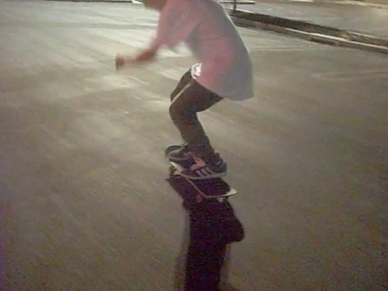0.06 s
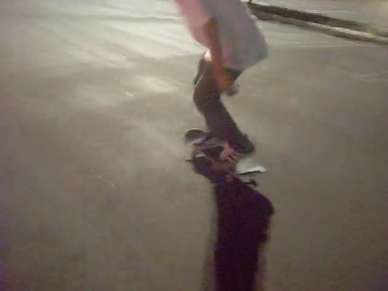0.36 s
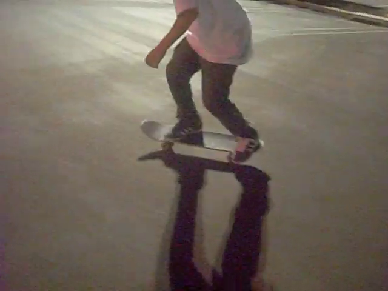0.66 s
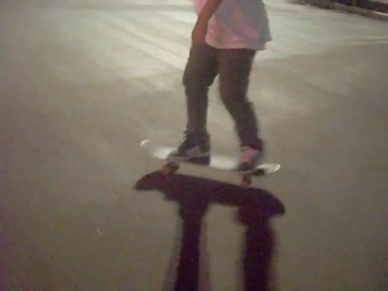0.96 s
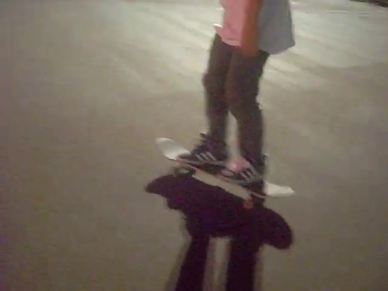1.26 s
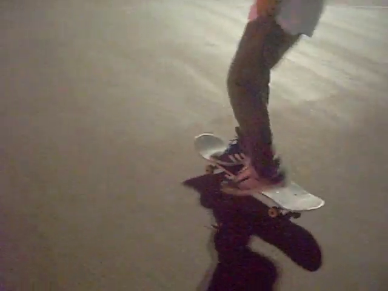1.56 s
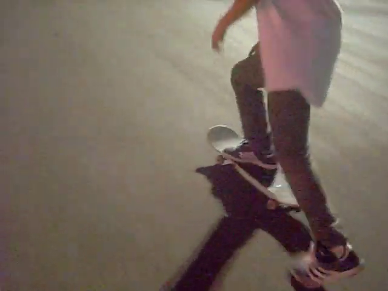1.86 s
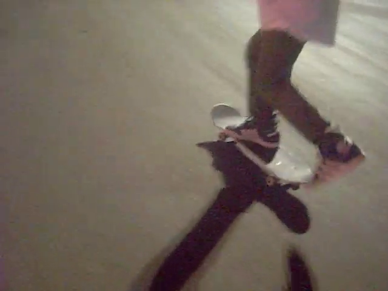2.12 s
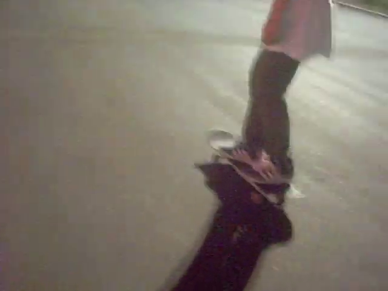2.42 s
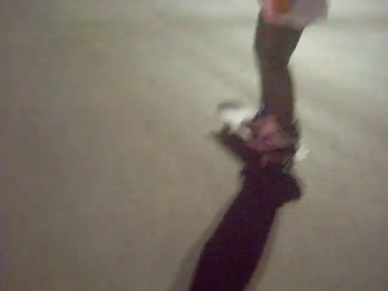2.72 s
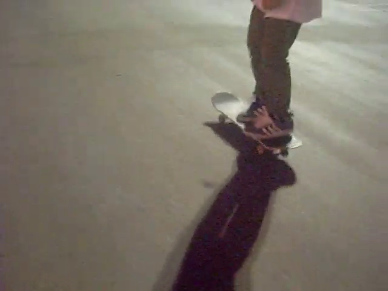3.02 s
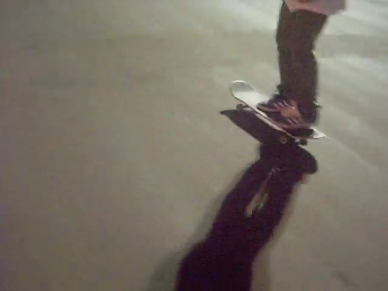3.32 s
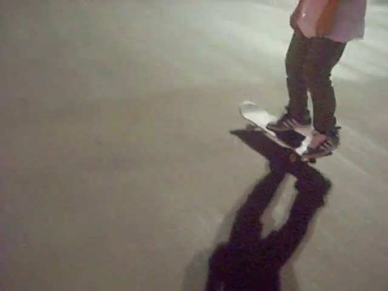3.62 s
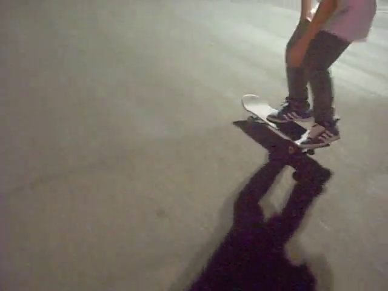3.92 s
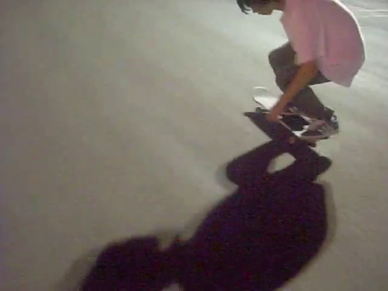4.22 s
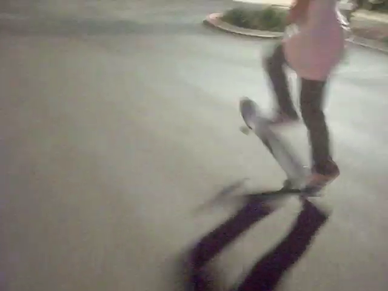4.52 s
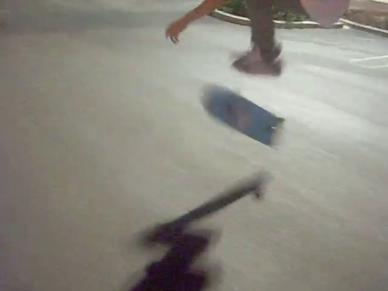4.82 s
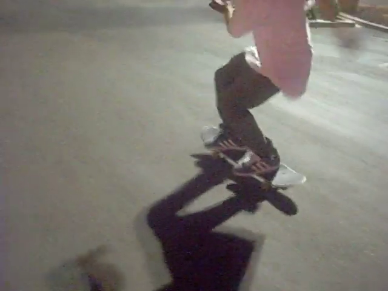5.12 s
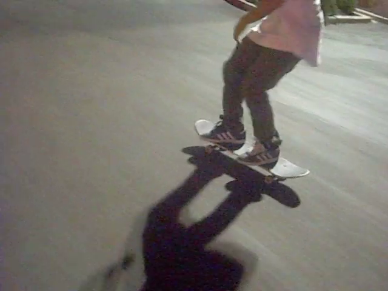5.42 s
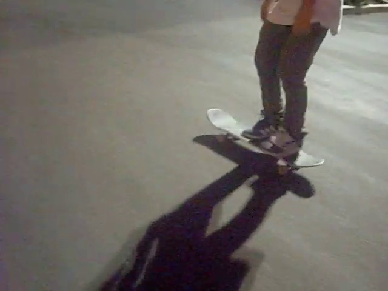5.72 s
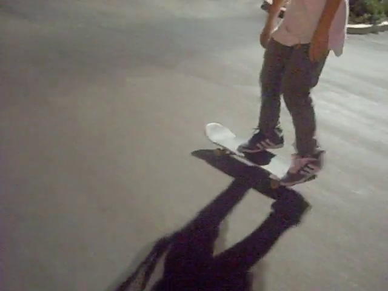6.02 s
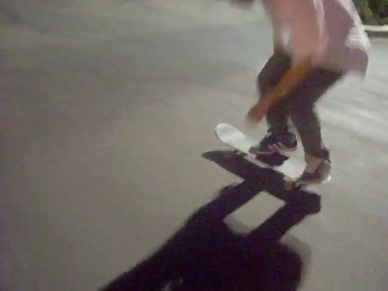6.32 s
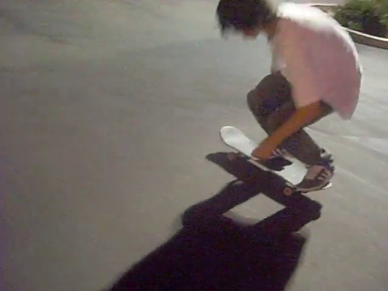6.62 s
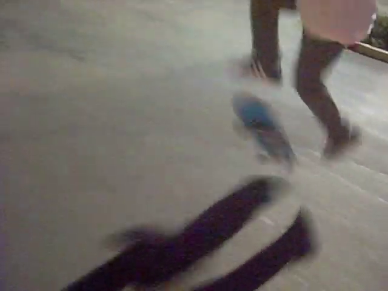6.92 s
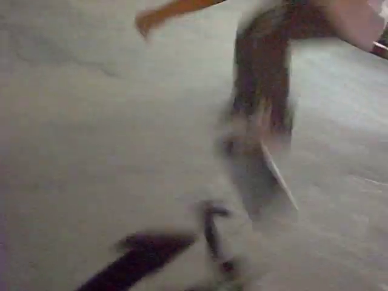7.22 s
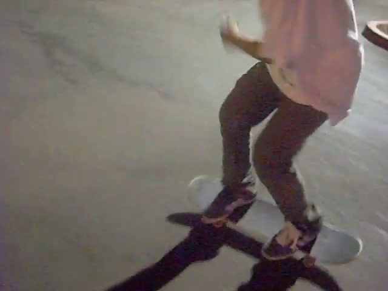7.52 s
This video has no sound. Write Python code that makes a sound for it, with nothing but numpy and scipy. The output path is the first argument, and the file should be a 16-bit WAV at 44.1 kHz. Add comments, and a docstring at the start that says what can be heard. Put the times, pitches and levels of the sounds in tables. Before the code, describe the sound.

A skateboard hits asphalt with a loud clack right at the start, followed by two lighter knocks around half a second. The wheels roll on with a gritty grind and low hum, swelling and easing, dotted with stone ticks, small deck knocks and faint, brief skids. Shoes scuff the grip tape from about 4.2 seconds, the tail pops lightly near 4.6, and after a short lull the board slams down at 5 with a loud, chattering crack. Wind buffets the close microphone, with soft low pops from about 5.8 to 6.8 seconds. Another scuff leads to a sharper pop at 7 and a second hard landing at 7.3, with a quick skid before the rolling continues to nearly 8 seconds. The landings overload slightly and leave a faint echo in the open parking lot. The sound has limited treble and a steady soft hiss.

```python
"""Open parking lot: a skateboarder rolls over rough asphalt, a small microphone close behind.
Grit strikes the wheels and rings the trucks, urethane skids, shoes scuff the grip tape.
Two flip tricks pop, go airborne and slam down; the deck chatters, rings and flexes.
Moving air buffets the microphone over steady hiss. The narrow-band recorder overloads on landings."""
import sys
import numpy as np
from scipy import signal
from scipy.fft import rfft, irfft, next_fast_len
from scipy.io import wavfile
from scipy.ndimage import uniform_filter1d

SR = 44100
rng = np.random.default_rng(int(sys.argv[2]) if len(sys.argv) > 2 else 0)


def dump_mix(stems):
    """Bounce the given channels to the path in sys.argv[1] as a 16-bit WAV at rate SR."""
    frames = np.atleast_2d(stems).T  # one column per channel
    limited = np.clip(frames, -1, 1)  # hard clip at full scale
    pcm = np.round(limited * 32767).astype(np.int16)
    wavfile.write(sys.argv[1], SR, pcm)


N = 342216
TIME_S = np.arange(N) / SR

# Grinding, with speed and closeness. Each row: time in seconds, relative level in dB.
ROLL_DB = [(0.0, -36.5), (0.52, -34.5), (0.72, -46), (1.2, -33.5), (1.38, -45.5), (1.72, -34.5),
           (1.98, -42), (2.58, -30.5), (2.76, -39), (3.18, -34), (3.66, -41), (3.93, -39), (4.55, -38.5),
           (5.22, -38.5), (5.55, -33), (5.66, -41), (6.22, -38), (6.41, -46), (6.85, -39), (7.48, -38),
           (7.76, -32)]
# Treble of the grinding. Each row: time in seconds, relative gain in dB.
TREBLE_DB = [(0.1, -2), (0.4, -5), (1.35, -4.5), (1.63, -2), (2.7, -4.5), (3.5, -.5), (5.5, -4.5),
             (5.8, -1.5), (7.2, -2.5), (7.7, -9)]
# Wheel hum, steadier than the grinding. Each row: time in seconds, relative level in dB.
HUM_DB = [(0.0, -45), (0.8, -49.5), (1.5, -45), (2.1, -45.5), (2.45, -39), (2.8, -46.5), (3.4, -45),
          (4.6, -47), (5.5, -42.5), (6.4, -45.5), (7.76, -45)]
# Rolling spectrum. Each row: frequency in Hz, gain in dB.
GRIND_EQ_DB = [(60, -26.5), (220, -15), (400, -2), (750, -4), (1300, -2.5), (1850, -1.5), (2450, -0.5),
               (2750, -5), (3400, -4), (4200, -5), (4900, -2.5), (5600, -9)]
# Wheel and truck resonances. Each row: centre in Hz, width in Hz, lift in dB.
WHEEL_MODES = [(536, 73, 5), (1004, 120, 4), (1305, 120, 3), (1830, 130, 3.5), (2354, 110, 2.5),
               (3145, 130, 5.5), (3570, 90, 1.5)]
# Flip tricks. Each row: take-off in seconds, touchdown in seconds.
FLIGHTS_S = [(4.6, 4.988), (7.02, 7.3)]
# Trucks slamming down. Each row: start in seconds, level in dB, length in seconds,
# tilt in dB per octave, flex pitch in Hz, flex peak in dB.
TRUCK_SLAMS = [(0.0003, -2.5, .012, 3.5, 793, -21), (0.4558, -11, 0.0041, -0.5, 940, -14),
               (4.987, -2, .009, 4, 473, -16), (5.0155, -1.5, .018, 4, 369, -13),
               (7.3, -3, 0.01094, 2.5, 535, -13), (7.3346, -2.5, .019, 5, 535, -5)]
# Single strikes. Each row: start in seconds, level in dB, decay in seconds, tilt in dB per octave.
BOARD_KNOCKS = [(0.052, -18, 0.0061, -1.5), (0.592, -12.5, 0.0038, 4), (0.6392, -27, .0032, 1),
                (0.769, -23.5, .0022, 3), (1.1413, -24, .0024, -1.5), (1.4244, -28, .0024, 2),
                (1.581, -21, 0.0034, 0.5), (1.697, -17, 0.0018, 1.5), (1.733, -21, 0.0021, -2),
                (2.2952, -21, 0.0021, 5), (2.547, -21.5, .0055, 4), (2.6481, -19.5, 0.0024, -0.5),
                (2.67, -23.5, .005, 0), (3.285, -26, 0.0031, 5), (3.5352, -25, .003, 1),
                (4.5595, -22.5, 0.0062, 1.5), (4.9645, -7.5, 0.0016, 0), (5.1016, -18, 0.008, -3),
                (5.3927, -23, 0.0034, 6.5), (6.139, -22.5, 0.0033, 0), (7.019, -14, 0.0052, 0),
                (7.6057, -21, 0.0028, 0), (7.734, -24.5, .0053, 7.5)]
# Impact spectrum. Each row: frequency in Hz, gain in dB.
CRACK_EQ_DB = [(60, -25), (200, -23), (350, -7), (520, -3), (720, -3), (920, -0.5), (1300, -1.5), (1700, 4),
               (2250, 1), (2600, -2.5), (3100, -1), (4000, -4.5), (5300, -7)]
# Deck resonances. Each row: frequency in Hz, relative level in dB, T60 in seconds.
DECK_MODES = [(316, -7.5, 0.036), (516, -5, .045), (638, -5, 0.049), (868, -2, .05), (1190, -5, 0.08),
              (1400, -14, 0.023), (1570, -1.5, 0.041), (1840, -3.5, 0.046), (2258, 1, 0.044),
              (2850, -5, 0.034), (3020, -3.5, 0.027), (3520, -4.5, 0.05), (4094, -4.5, 0.046),
              (4770, -9, .035)]
# Sideways wheel slips. Each row: midpoint in seconds, length in seconds, level in dB,
# mid pitch in Hz, glide as end-to-start pitch ratio.
WHEEL_SKIDS = [(0.528, 0.064, -43, 1800, 1.03), (0.93, 0.25, -40, 3750, 1.1),
               (1.117, 0.15, -36.5, 2234, 0.9), (1.243, 0.058, -35.5, 1850, 0.93),
               (1.591, 0.071, -38.5, 3600, 1.3), (1.739, 0.031, -31.5, 2086, .9),
               (2.66, 0.076, -32, 1700, 0.75), (3.112, 0.39, -51, 3080, 0.98),
               (5.09, 0.077, -30.5, 1906, .8), (7.319, 0.026, -23.5, 1700, 1),
               (7.404, 0.042, -32, 3920, .85), (7.427, 0.032, -30, 887, 0.72)]
# Soles on grip tape. Each row: peak time in seconds, level in dB, rise in seconds, fall in seconds.
SHOE_SCUFFS = [(4.24, -26.5, 0.0014, 0.0032), (4.253, -26.5, 0.0023, 0.0083),
               (4.283, -32.5, 0.0017, 0.0023), (4.407, -28, 0.0036, 0.0047), (4.568, -22.5, 0.0095, 0.0046),
               (4.622, -30.5, 0.0043, 0.0055), (6.839, -23.5, .003, 0.004), (6.893, -19, 0.0064, 0.0037)]
# Airflow at the microphone. Each row: time in seconds, level in dB.
WIND_DB = [(0.0, -43), (0.25, -59.5), (1.27, -46.5), (1.6, -56.5), (2.2, -52.5), (2.45, -42.5),
           (2.68, -55.5), (3.38, -40.5), (3.7, -49.5), (4.0, -41), (4.25, -38), (4.4, -50), (4.63, -35.5),
           (4.8, -45), (5.42, -43.5), (5.8, -35), (6.5, -42), (7.05, -40), (7.76, -46)]
# Turbulence spectrum. Each row: frequency in Hz, gain in dB.
BUFFET_EQ_DB = [(15, -4), (40, -0.5), (100, -0.5), (200, -1.5), (350, -6.5), (600, -21), (1200, -35),
                (3000, -55.5)]
# Eddies on the microphone. Each row: midpoint in seconds, peak in dB, pitch in Hz.
EDDY_POPS = [(5.7605, -18, 380), (5.7715, -16.5, 700), (5.803, -16.5, 517), (5.8184, -13, 675),
             (5.936, -20.5, 640), (6.058, -25, 450), (6.142, -14, 670), (6.152, -18, 480),
             (6.588, -19.5, 595), (6.618, -19.5, 300), (6.846, -23, 423)]
# Reverberation of the lot. Each row: frequency in Hz, T60 in seconds.
LOT_T60_S = [(200, 0.58), (1500, 0.65), (5500, 0.22)]
# Background spectrum. Each row: frequency in Hz, gain in dB.
HISS_EQ_DB = [(40, -0.5), (200, -5.5), (600, -2.5), (1700, 6.5), (3500, -6.5), (5000, -0.5), (5600, -12.5)]
# Recorder passband. Each row: frequency in Hz, gain in dB.
PASSBAND_DB = [(20, -3), (5150, 0), (5500, -4), (5800, -9.5), (6050, -20), (6350, -47.5), (6700, -100)]
# Treble response after the overload. Each row: frequency in Hz, gain in dB.
SPLASH_EQ_DB = [(6000, 0.5), (9000, -1), (12000, -3.5), (15000, -2)]


def rolling(air_hum_db=-6.5, crunch_s=0.00097):
    """Asphalt stones strike the wheels; each brief crunch rings wheels and trucks."""
    stones = signal.lfilter([1], [1, -np.exp(-1 / (crunch_s * SR))], grit(per_s=700, spread_db=3.5) ** 2)
    crunch = np.sqrt(stones / stones.mean() + 0.4) * rng.standard_normal(N)
    drive = unit_rms(crunch * gain(1.17 * drift(rate_hz=50)))
    hz, t, spectra = signal.stft(drive, SR, nperseg=512, noverlap=384)
    # Contact patches shift: resonances swell and fade at random.
    patches = uniform_filter1d(rng.standard_normal(spectra.shape), size=4, axis=0)
    patches_db = 2.14 * unit_rms(uniform_filter1d(patches, size=22, axis=1))
    modes_db = sum(db / (1 + (2 * (hz - f) / width) ** 2) for f, width, db in WHEEL_MODES)
    hum_db = at_time(HUM_DB, t) - at_time(ROLL_DB, t) + air_hum_db * airborne(t)
    eq_db = (at_hz(GRIND_EQ_DB, hz) + modes_db)[:, None] + patches_db
    eq_db += np.outer(at_hz([(2400, 0.13), (3200, 1)], hz), at_time(TREBLE_DB, t) + 3.5)
    eq_db += np.outer(at_hz([(650, 1), (1000, 0.04)], hz), hum_db + 9.5)
    grind = signal.istft(spectra * gain(eq_db), SR, nperseg=512, noverlap=384)[1][:N]
    roughness_db = 0.92 * drift(rate_hz=6)
    level_db = rolling_db(TIME_S) + landing_surge_db(TIME_S) + roughness_db
    return band_limit(gain(level_db + 9.5) * grind)


def airborne(t, fade_s=0.155):
    """0 on the ground, rising to 1 in flight."""
    return sum(np.clip((t - off) / fade_s, 0, 1) * (t < down) for off, down in FLIGHTS_S)


def rolling_db(t, air_db=-4):
    """Rolling level; drops in flight."""
    return at_time(ROLL_DB, t) + air_db * airborne(t)


def landing_surge_db(t, peak_db=15.5, decay_s=0.1):
    """Loaded wheels grind harder at touchdown, then ease."""
    return peak_db * sum((t >= down) * np.exp(-abs(t - down) / decay_s) for _, down in FLIGHTS_S)


def impact(db, decay_s, tilt_db_oct):
    """Hard contacts crunch for milliseconds; the deck rings and the trucks rattle on."""
    def tilt_db(f):
        return tilt_db_oct * np.log2(np.maximum(f, 800) / 1500)

    t, hz = np.arange(8192) / SR, np.fft.rfftfreq(2048, 1 / SR)
    contact = np.exp(-t / decay_s)
    rattle = gain(-22.5) * np.exp(-t / 0.02)
    crunch = rng.choice([-1, 1], len(t)) * (contact + rattle)
    ring = np.zeros(len(t))
    for mode_hz, mode_db, t60_s in DECK_MODES:
        cycles = mode_hz * rng.normal(1, 0.0018) * t + rng.random()
        ring += gain(mode_db + tilt_db(mode_hz) - 60 * t / t60_s) * np.sin(2 * np.pi * cycles)
    response = minimum_phase(at_hz(CRACK_EQ_DB, hz) + at_hz(PASSBAND_DB, hz) / 2 + tilt_db(hz))
    crack = unit_rms(signal.fftconvolve(crunch, response)[:len(t)])
    return gain(db) * np.sqrt(np.mean(contact ** 2)) * (crack + gain(-9.5) * unit_rms(ring))


def slams(gap_s=0.0048, contact_s=0.0027, settle_db=-8.5, dulling_db_oct=-12, flex_cycles=4.1):
    """The board chatters down, each contact weaker and duller; the deck flexes from halfway."""
    out, t = np.zeros(N), TIME_S[:SR // 10]
    for start_s, db, length_s, tilt_db_oct, flex_hz, flex_db in TRUCK_SLAMS:
        for delay_s in np.arange(6) * gap_s:
            settled = min(delay_s / length_s, 1)
            hit = impact(db + settle_db * settled ** 2, contact_s, tilt_db_oct + dulling_db_oct * settled)
            add(out, start_s + delay_s, (settled < 1) * hit)
        flex = np.exp(-(t * flex_hz / flex_cycles) ** 1.4) * np.sin(2 * np.pi * flex_hz * t)
        add(out, start_s + length_s / 2, gain(flex_db) * flex)
    return out


def knocks():
    """Tail, wheels and shoes strike once."""
    out = np.zeros(N)
    for start_s, db, decay_s, tilt_db_oct in BOARD_KNOCKS:
        add(out, start_s, impact(db, decay_s, tilt_db_oct))
    return out


def skids():
    """Urethane sticks and slips on asphalt: a fuzzy, gliding chirr."""
    out = np.zeros(N)
    for mid_s, length_s, db, hz, glide in WHEEL_SKIDS:
        position = np.linspace(-0.5, 0.5, round(length_s * SR))
        noise = rng.standard_normal((len(position), 2)) @ [1, 1j]
        fuzz = signal.lfilter(*signal.butter(2, hz * 0.087, fs=SR), noise)
        chirr = (fuzz * np.exp(2j * np.pi * np.cumsum(hz * glide ** position) / SR)).real
        add(out, mid_s - length_s / 2, gain(db) * unit_rms(chirr) * np.cos(np.pi * position))
    return out


def scuffs():
    """A sole drags over grip tape: short swells of bright, sandy noise."""
    envelope = sum(gain(db) * np.exp(-np.maximum((peak_s - TIME_S) / rise_s, (TIME_S - peak_s) / fall_s))
                   for peak_s, db, rise_s, fall_s in SHOE_SCUFFS)
    sand = equalize(grit(per_s=5100, spread_db=2.5), [(200, -12.5), (900, -13), (2000, 3.5), (5000, 0.5)])
    return band_limit(envelope * sand) / band_limit(sand).std()


def pebbles(per_s=2.8, lift_db=7.5, spread_db=1):
    """Stray stones tick under the wheels, tracking the rolling level."""
    out = np.zeros(N)
    for _ in range(round(per_s * N / SR)):
        start_s = rng.random() * N / SR
        db = rolling_db(start_s) + rng.normal(lift_db, spread_db)
        add(out, start_s, impact(db, decay_s=0.0028, tilt_db_oct=2))
    return out


def wind(wake_s=0.0118, wake_db=-6, wake_pitch_ratio=0.71):
    """Lumpy low turbulence, plus single eddies that each shed a weaker, lower one."""
    lumps = grit(per_s=240, spread_db=3) + 0.9 * rng.standard_normal(N)
    lumps *= gain(1.5 * drift(rate_hz=27))
    out = gain(at_time(WIND_DB, TIME_S)) * unit_rms(equalize(lumps, BUFFET_EQ_DB))
    for mid_s, db, hz in EDDY_POPS:
        add(out, *eddy(mid_s, db, hz))
        add(out, *eddy(mid_s + wake_s * rng.uniform(0.3, 1), db + wake_db, hz * wake_pitch_ratio))
    return out


def eddy(mid_s, db, hz):
    """Suction, then a push on the diaphragm. Returns start in seconds and pulse."""
    cycles = np.arange(-2, 2, hz / SR)
    swing = np.sin(2 * np.pi * cycles) * np.exp(-(cycles / 0.41) ** 2)
    return mid_s - 2 / hz, gain(db) * swing / abs(swing).max()


def lot_reverb(x, echoes_per_s=2000, build_s=0.034):
    """Scatter from kerbs and distant walls."""
    taps = rng.standard_normal(SR) * (rng.random(SR) < echoes_per_s / SR)
    hz, t, spectra = signal.stft(taps, SR, nperseg=256)
    envelope = (1 - np.exp(-t / build_s)) * gain(-60 * t / at_hz(LOT_T60_S, hz)[:, None])
    tail = signal.istft(spectra * envelope, SR, nperseg=256)[1]
    return signal.fftconvolve(x, tail / np.linalg.norm(tail))[:N]


def hiss():
    """Steady noise of the night and the microphone."""
    return gain(-48) * unit_rms(band_limit(equalize(rng.standard_normal(N), HISS_EQ_DB)))


def grit(per_s, spread_db):
    """Random clicks, mostly small; rms 1."""
    size = gain(spread_db * np.minimum(rng.exponential(1, N), 4))
    return unit_rms(size * rng.choice([-1, 1], N) * (rng.random(N) < per_s / SR))


def drift(rate_hz):
    """Low-passed noise; rms 1."""
    return unit_rms(fft_filter(rng.standard_normal(N), lambda hz: -10 * np.log10(1 + (hz / rate_hz) ** 4)))


def gain(db):
    """dB to amplitude."""
    return 10 ** (np.asarray(db) / 20)


def unit_rms(x):
    """Scale to rms 1."""
    return x / np.sqrt(np.mean(x ** 2) + 1e-20)


def at_time(points, t):
    """Interpolate over time."""
    return np.interp(t, *np.transpose(points))


def at_hz(points, hz):
    """Interpolate over log frequency."""
    f, value = np.transpose(points)
    return np.interp(np.log(hz + 1), np.log(f + 1), value)


def add(mix, start_s, sound):
    """Mix in place."""
    part = mix[max(round(start_s * SR), 0):][:len(sound)]
    part += sound[:len(part)]


def fft_filter(x, db_at_hz):
    """Zero-phase filter from a gain function."""
    size = next_fast_len(len(x) + 4096)
    return irfft(rfft(x, size) * gain(db_at_hz(np.fft.rfftfreq(size, 1 / SR))), size)[:len(x)]


def equalize(x, points):
    """Filter by (Hz, dB) points."""
    return fft_filter(x, lambda hz: at_hz(points, hz))


def band_limit(x):
    """The recorder passes little above 6 kHz."""
    return equalize(x, PASSBAND_DB)


def minimum_phase(db):
    """Causal impulse response with this spectrum."""
    log_gain = np.log(gain(np.r_[db, db[-2:0:-1]]))
    return np.fft.ifft(np.exp(np.conj(signal.hilbert(log_gain)))).real


def scene():
    """Board in the lot, over hiss and wind; mono."""
    hits = band_limit(slams() + knocks() + skids()) + scuffs()
    board = rolling() + hits + gain(-27.5) * lot_reverb(hits)
    return (board + hiss() + band_limit(wind() + pebbles()))[None]


def record(dry):
    """Soft overload on the landings splashes treble above the band; then a low-pass."""
    ceiling, knee, cutoff_hz = 0.74, 6, 15800
    clipped = dry[0] / (1 + abs(dry[0] / ceiling) ** knee) ** (1 / knee)
    lowpass = signal.firwin(255, cutoff_hz, window=("kaiser", 9), fs=SR)
    return signal.oaconvolve(equalize(clipped, SPLASH_EQ_DB), lowpass, "same")[None]


dry = scene()
out = record(dry)
dump_mix(out)
```